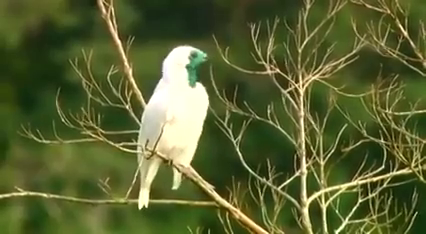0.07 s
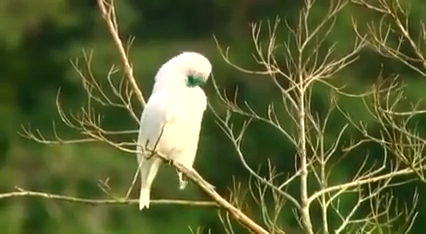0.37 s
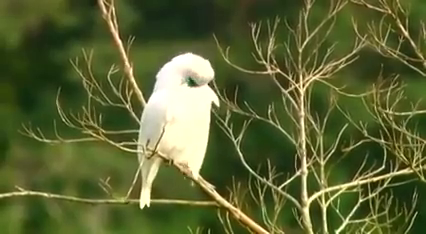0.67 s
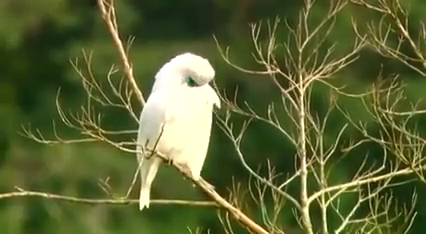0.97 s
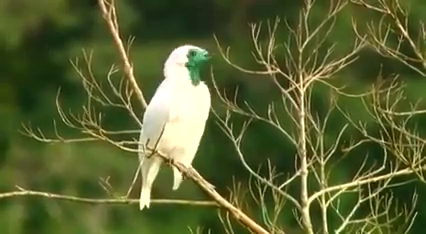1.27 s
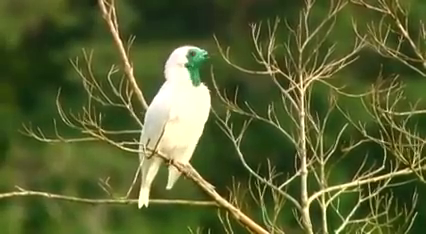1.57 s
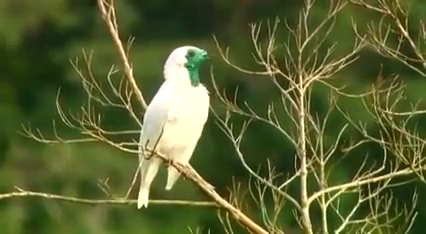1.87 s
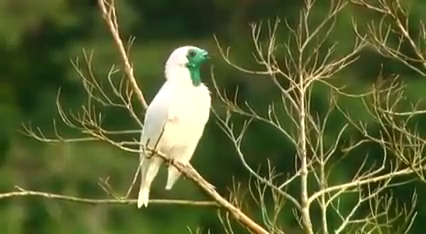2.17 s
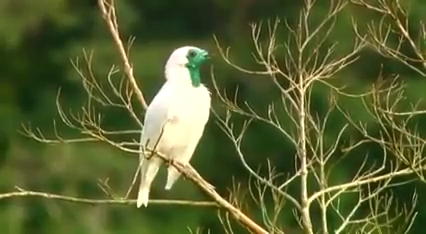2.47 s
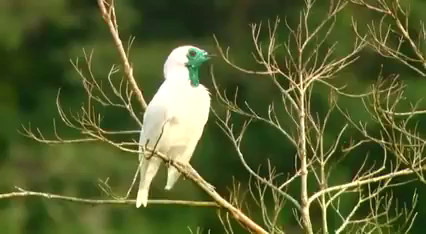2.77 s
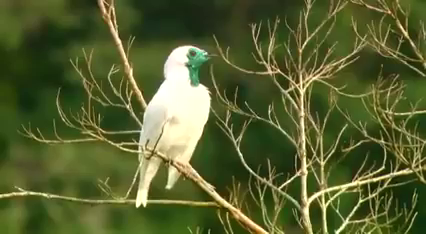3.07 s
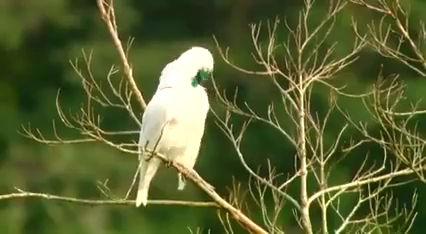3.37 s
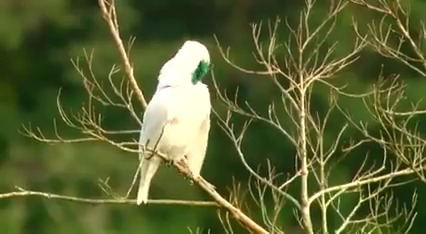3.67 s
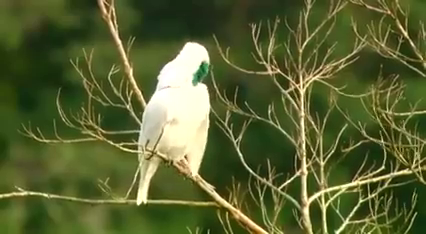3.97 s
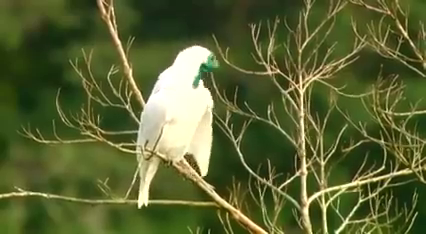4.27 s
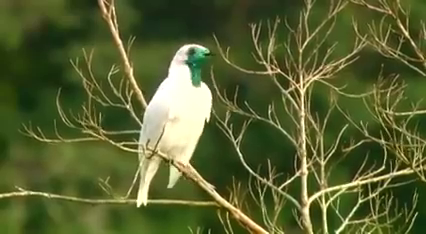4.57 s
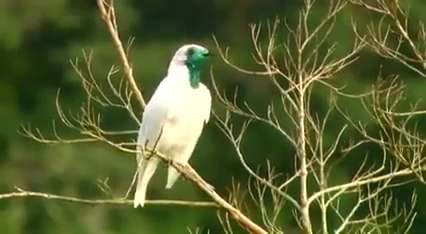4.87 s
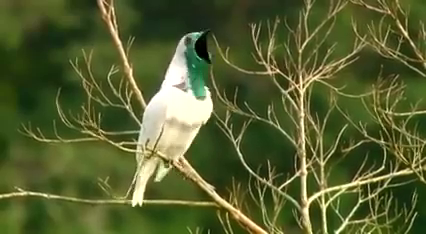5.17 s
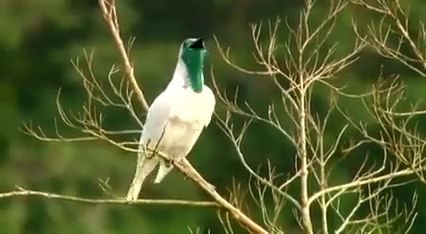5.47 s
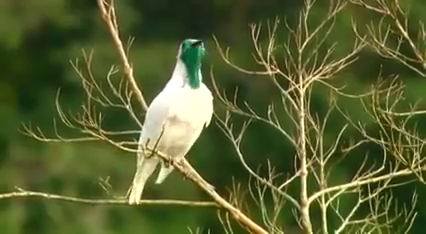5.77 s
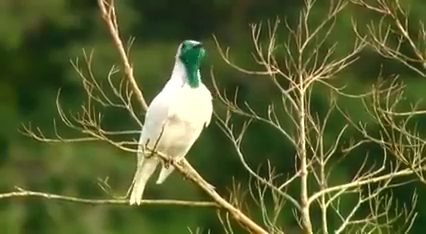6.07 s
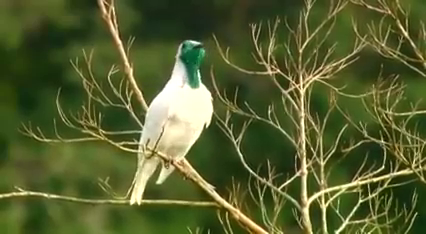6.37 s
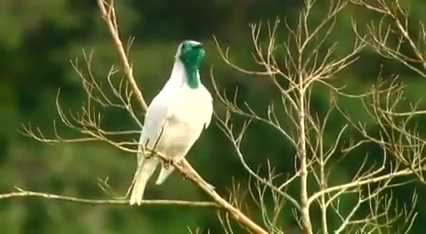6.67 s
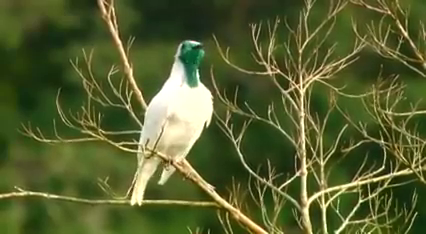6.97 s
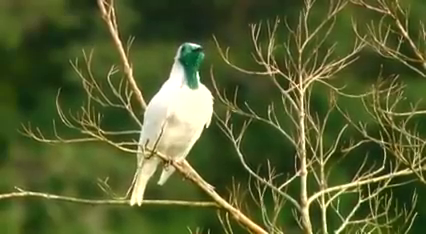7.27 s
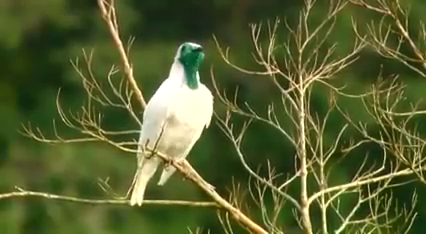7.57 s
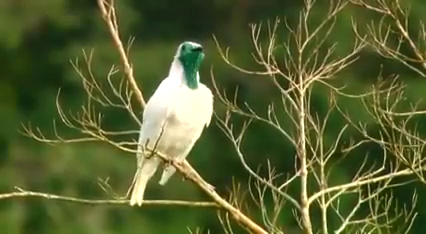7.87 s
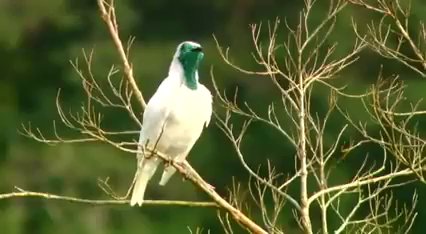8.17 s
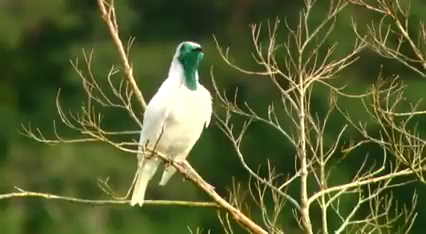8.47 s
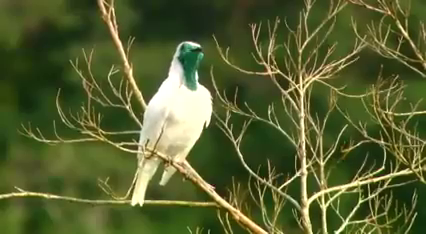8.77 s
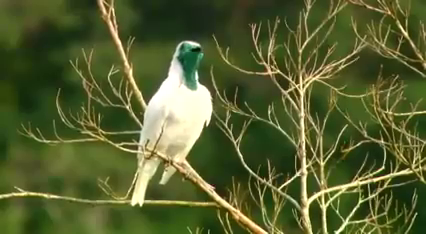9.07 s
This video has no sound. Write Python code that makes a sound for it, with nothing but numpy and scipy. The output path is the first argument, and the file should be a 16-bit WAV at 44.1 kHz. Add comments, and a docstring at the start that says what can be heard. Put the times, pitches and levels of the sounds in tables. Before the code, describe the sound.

One loud, abrupt bellbird call, rasping and then ringing, stands out midway through a quiet forest scene. Around it come duller calls from distant bellbirds, short sharp chips and faint whistles, all over a constant insect hiss, a broad valley rush and a faint far-off drone. A low rumble on the microphone swells under the loud call and again at the end, along with two short, soft rustles.

```python
"""A bellbird on a bare branch above the forest gives one loud clang: a harsh rasp into a pure ring.
The two sides of its syrinx sound in turn. Rivals answer from far off, small birds chip,
others whistle deep in the forest, and the trees throw back echoes.
Behind them insects hiss steadily over the rush of the valley and a faint, distant drone.
A low rumble on the microphone swells under the clang and near the end, where two rustles come close by."""
import sys
import numpy as np
from scipy import signal
from scipy.fft import rfft, irfft, next_fast_len
from scipy.io import wavfile

SR = 44100
rng = np.random.default_rng(int(sys.argv[2]) if len(sys.argv) > 2 else 0)


def int16_out(signal):
    """Quantize to a 16-bit WAV file."""
    q = np.round(np.clip(np.atleast_2d(signal).T, -1, 1) * 32767)
    wavfile.write(sys.argv[1], SR, q.astype(np.int16))


N = 402191
TIME = np.arange(N) / SR
FLUTTER_HZ, RASP_HZ = 80.2, 1444   # the bellbird's low voice: flutter rate, centre pitch

# colours of the valley's rush and of the insect chorus: frequency_hz, relative_db
VALLEY_SPECTRUM = [(30, -7), (100, -4), (200, -2), (300, -2.5), (420, 1), (700, -1.57), (1100, -6.5),
                   (1700, -13.5), (2800, -21), (5000, -19), (10000, -33)]
INSECT_SPECTRUM = [(2500, -27), (3600, -18.5), (4500, -3), (4900, -1.5), (5300, -8), (6100, -5.5),
                   (7000, -16), (8500, -24.5), (10000, -32)]
# course of the far-off drone: time_s, pitch_hz, level_db
DRONE_COURSE = [(0, 500, -83), (.3, 472, -57.5), (.6, 457, -54.5), (.95, 490, -57.5), (1.15, 398.6, -64),
                (2, 421, -60.5), (3.2, 412, -60), (4, 427.4, -64), (6.7, 400, -71.5), (7.15, 412, -52),
                (7.6, 403, -79)]
# course of the low rumble on the microphone: time_s, relative_db
RUMBLE_COURSE = [(0, -37), (.25, -65), (.7, -66), (3.3, -64), (3.7, -63), (3.9, -68), (5.1, -72.5),
                 (5.45, -42), (5.7, -49), (5.85, -66), (8.1, -61.5), (8.25, -45), (8.36, -59),
                 (8.48, -41.5), (8.66, -66), (8.84, -48), (9.12, -37)]
# its colour: frequency_hz, relative_db
RUMBLE_SPECTRUM = [(10, 4.5), (25, -1.5), (50, -16.5), (100, -26.5), (300, -36), (1000, -58)]
# echoes off the trees and the slope: delay_s, gain_db
FOREST_ECHOES = [(.014, -24), (0.046, -26), (.085, -26), (.145, -25.5), (.235, -43), (.29, -33.5)]
# a small bird's chips: peak_s, gain_db, pitch_ratio
CHIP_CALLS = [(0.014, -26.5, 1.03), (2.418, -37, 1.08), (4.31, -33.5, .96), (5.929, -34, 0.95),
              (7.439, -28, 1), (8.781, -33.5, 1.02)]
# course of one chip: from_peak_s, pitch_hz, relative_db
CHIP_COURSE = [(-.02, 6200, -22), (-.013, 4894, -13.5), (-.006, 4350, -6.5), (.004, 3964, -2),
               (.011, 3590, -15.5), (0.015, 3440, -3), (0.021, 2620, -29)]
# distant whistles: start_s, length_s, first_hz, middle_hz, last_hz, level_db, roughness (0-1)
WHISTLE_NOTES = [(0.257, 0.03, 2890, 2690, 2580, -52.5, .5), (1.356, .06, 2850, 2650, 2390, -58, .7),
                 (1.721, 0.057, 1998, 2222, 2170, -52.5, 1), (2.061, 0.095, 2750, 2705, 2650, -56.5, .9),
                 (2.692, 0.068, 2570, 2700, 2760, -55.5, .8), (2.748, .11, 4150, 4080, 3550, -54.5, 0.38),
                 (3.572, .08, 2760, 2700, 2400, -51.5, 1), (3.638, 0.08, 2420, 2696, 2900, -45, 0.21),
                 (3.754, 0.055, 1990, 2060, 1850, -53, .4), (4.04, .11, 4290, 4160, 3950, -53.5, 0.3),
                 (4.07, 0.09, 2850, 2755, 3050, -44, 0.26), (4.183, .1, 4860, 5500, 5400, -59, 0.3),
                 (4.208, .07, 2075, 2250, 1950, -52.5, .6), (4.72, 0.069, 3450, 3520, 3280, -58, .3),
                 (6.062, 0.045, 3800, 3920, 3530, -53.5, 0.54), (6.817, .11, 1850, 1930, 1860, -56, .2),
                 (7.12, 0.096, 4170, 4143, 3400, -49.5, 0.25), (7.16, 0.071, 1700, 1780, 1500, -54.5, .1),
                 (7.343, .1, 4170, 3750, 3570, -56, .3), (7.392, 0.16, 2250, 1894, 1670, -52.5, .1),
                 (7.869, .17, 3850, 3880, 4180, -53, 0.48), (8.058, 0.13, 5240, 4140, 3690, -50.5, 0.5),
                 (8.18, .14, 4210, 4530, 4600, -43.5, 0.27), (8.35, 0.12, 8340, 6730, 5600, -53.5, 1),
                 (8.417, .12, 6800, 6300, 6140, -54, 1), (8.43, .085, 5570, 5340, 5430, -35, 0.11),
                 (8.853, .11, 1390, 1300, 1230, -52, .1), (9.045, 0.028, 9950, 10050, 9900, -38, 0.9)]
# bellbirds near and far: start_s, rasp_gain_db, held_end_db, ring_gain_db, ring_hz, dulling_db_per_octave
BELLBIRD_CALLS = [(1.953, -42.5, -9, -75, 3170, 28), (2.19, -43.5, -10, -74, 3170, 32),
                  (4.788, -46, 2, -64, 3160, 16), (5.226, -38, -6, -68, 3160, 24),
                  (5.391, -18, 0.5, -23, 3148, 0.5), (6.136, -44, -3, -72, 3170, 28),
                  (6.474, -28, -18.5, -48.5, 3185, 17.5), (8.976, -48, -4, -68, 3170, 20)]
# resonances of throat and gaping beak: centre_hz, width_hz, gain_db
THROAT_RESONANCES = [(1551, 240, 0), (2780, 340, -2.5), (3190, 270, -4.5), (4205, 370, 0),
                     (4790, 320, -6.5), (5220, 660, -12.5), (6300, 420, -7.5), (7340, 220, -18),
                     (7743, 610, -19.5), (8540, 440, -25), (9400, 450, -35)]
# course of the low voice: into_call_s, relative_db, harshness (0-1)
RASP_COURSE = [(0, -24, 1), (.005, 0.5, 0.99), (.026, 1, 0.98), (.046, -1, 0.81), (.062, -2.5, 0.65),
               (.078, -12, 0.54), (.1, -12, .48), (.15, -14, 0.1), (.178, -12.5, .35), (.195, -50, 0)]
# course of the high voice: into_call_s, relative_db
RING_COURSE = [(.06, -42), (.085, -10), (.11, -2.5), (.145, 0.5), (.175, -4), (.193, -3.5), (.21, -21.5),
               (.25, -45)]
# harmonics of the high voice: multiple, relative_db
RING_HARMONICS = [(1, -0.5), (2, -13), (3, -28.5)]
# rustles close to the microphone: start_s, length_s, level_db
CLOSE_RUSTLES = [(8.85, 0.14, -48), (9.044, 0.062, -48.5)]
# their colour: frequency_hz, relative_db
RUSTLE_SPECTRUM = [(100, 3.5), (600, 1), (1500, -12), (3000, -17.5), (4300, -7), (7000, -18), (10000, -19)]


def from_db(db):
    """Decibels to gain."""
    return 10 ** (np.asarray(db) / 20)


def rms_one(x):
    """Scale to unit power."""
    return x / np.sqrt(np.mean(x ** 2) + 1e-20)


def along(course, t):
    """The columns of a course at times t."""
    times, *columns = np.transpose(course)
    return [np.interp(t, times, column) for column in columns]


def add(out, start_s, sound):
    """Mix a sound in at a time."""
    at = int(round(start_s * SR))
    sound = sound[max(-at, 0):max(N - at, 0)]
    out[max(at, 0):max(at, 0) + len(sound)] += sound


def phase_of(hz):
    """Running phase of a moving pitch."""
    return 2 * np.pi * np.cumsum(hz) / SR


def waver(rate_hz, size):
    """Random motion, mostly slower than rate_hz, at unit power."""
    hz = np.fft.rfftfreq(size, 1 / SR)
    return rms_one(irfft(rfft(rng.standard_normal(size)) / (1 + (hz / rate_hz) ** 2), size))


def noise(spectrum):
    """Noise of a given colour, at unit power."""
    size = next_fast_len(N)
    hz, db = np.transpose(spectrum)
    gain = from_db(np.interp(np.log(np.fft.rfftfreq(size, 1 / SR) + 1), np.log(hz), db))
    return rms_one(irfft(rfft(rng.standard_normal(size)) * gain, size)[:N])


def valley(level_db=-52.0, sway_db=1.34):
    """The broad rush of the valley, swaying a little in level."""
    return from_db(level_db + sway_db * waver(3.9, N)) * noise(VALLEY_SPECTRUM)


def insects(level_db=-61.5, flicker_db=1.1, shrill_hz=4880, shrill_width_hz=110, shrill_db=-64.5):
    """A flickering background chorus with one narrow, shrill band."""
    chorus = from_db(level_db + flicker_db * waver(25, N)) * noise(INSECT_SPECTRUM)
    shrill = from_db(shrill_db) * waver(shrill_width_hz, N) * np.sin(2 * np.pi * shrill_hz * TIME)
    return chorus + shrill


def drone(wobble_hz=6):
    """A faint, wandering tone a long way off."""
    pitch_hz, level_db = along(DRONE_COURSE, TIME)
    return from_db(level_db) * np.sin(phase_of(pitch_hz + wobble_hz * waver(19.8, N)))


def microphone_rumble(trim_db=-1):
    """Low rumble on the microphone: it drops at the start, swells under the loud clang and near the end."""
    swell_db, = along(RUMBLE_COURSE, TIME)
    return from_db(swell_db + trim_db) * noise(RUMBLE_SPECTRUM)


def forest(direct, scatter_db, decay_s, leaf_cutoff_hz):
    """The direct sound plus distinct echoes and a thin scatter off trunks and leaves, both dulled."""
    t = np.arange(SR) / SR
    response = rng.standard_normal(SR) * from_db(-60 * t / decay_s) * (1 - np.exp(-t / 0.029))
    response *= from_db(scatter_db) / np.linalg.norm(response)
    for delay_s, gain_db in FOREST_ECHOES:
        response[int(delay_s * SR)] += from_db(gain_db)
    response = signal.sosfilt(signal.butter(1, leaf_cutoff_hz, fs=SR, output="sos"), response)
    return direct + signal.fftconvolve(direct, response)[:N]


def chips(jitter_hz=150, upper_ratio=1.27, upper_db=-16, octave_db=-30, scratch_db=-14):
    """A small bird's fast downward sweeps, with a second voice above and a scratchy edge."""
    out, t = np.zeros(N), np.arange(CHIP_COURSE[0][0], CHIP_COURSE[-1][0], 1 / SR)
    pitch_hz, shape_db = along(CHIP_COURSE, t)
    for peak_s, gain_db, pitch_ratio in CHIP_CALLS:
        phase = phase_of(pitch_ratio * pitch_hz + jitter_hz * waver(600, len(t)))
        tone = from_db(shape_db) * (np.sin(phase) + from_db(octave_db) * np.sin(2 * phase))
        upper_voice = from_db(upper_db) * np.sin(upper_ratio * phase)
        scratch = from_db(scratch_db) * waver(1700, len(t)) * np.sin(phase)
        edge = signal.windows.tukey(len(t)) * (upper_voice + scratch)
        add(out, peak_s + t[0], from_db(gain_db) * (tone + edge))
    return out


def whistles(full_jitter_hz=330, shimmer=0.27):
    """Birds farther off: each whistle bends through three pitches under a rounded swell."""
    out = np.zeros(N)
    for start_s, length_s, *pitches_hz, level_db, roughness in WHISTLE_NOTES:
        progress = np.linspace(0, 1, int(length_s * SR))
        bend_hz = np.polyval(np.polyfit([0, .5, 1], pitches_hz, 2), progress)
        pitch_hz = bend_hz + roughness * full_jitter_hz * waver(350, len(progress))
        swell = np.sin(np.pi * progress) * (1 + shimmer * waver(70, len(progress)))
        add(out, start_s, from_db(level_db) * swell * np.sin(phase_of(pitch_hz)))
    return out


def twitter(count=36, quietest_db=-64, range_db=2, max_glide=0.23):
    """Tiny gliding notes at random moments, from deep in the forest."""
    out = np.zeros(N)
    for when, length, height, slope, strength in rng.random((count, 5)):
        progress = np.linspace(0, 1, int((.03 + .06 * length) * SR))
        glide = 1 + max_glide * (2 * slope - 1) * progress
        pitch_hz = (1800 + 2600 * height) * glide + 100 * waver(360, len(progress))
        swell = from_db(quietest_db + range_db * strength) * np.sin(np.pi * progress)
        add(out, when * N / SR, swell * np.sin(phase_of(pitch_hz)))
    return out


def throat(hz, dulling):
    """Gain of the bellbird's steep-sided throat resonances, less the treble lost over distance."""
    gain = sum(from_db(gain_db) / (1 + np.abs(2 * (hz - centre_hz) / width_hz) ** 3)
               for centre_hz, width_hz, gain_db in THROAT_RESONANCES)
    return gain * from_db(-dulling * np.log2(np.clip(hz / RASP_HZ, 1, 3)))


def rasp(t, held_end_db, dulling, swing_hz=136, jitter_hz=28, first_crest_s=0.00601,
         soften_db=19, hiss_gain=0.71, odd_burst_db=4.0, shimmer_db=3.0):
    """The low voice: a flutter swings its pitch, so each harmonic flashes through the resonances."""
    shape_db, harshness = along(RASP_COURSE, t)
    flutter = 2 * np.pi * FLUTTER_HZ * (t - first_crest_s)
    # as it relaxes, the voice settles one flutter step higher, near the lowest resonance
    pitch_hz = RASP_HZ + FLUTTER_HZ * (harshness < .5) + harshness * swing_hz * np.cos(flutter)
    # single cycles come early or late without losing the beat
    jitter = rms_one(np.gradient(waver(490, len(t))))
    phase = phase_of(pitch_hz + harshness * jitter_hz * jitter)
    fundamental = throat(pitch_hz, dulling) * np.sin(phase)
    overtones = 0
    for k in range(2, 8):
        # odd harmonics burst out as the pitch falls, even ones as it climbs
        burst_db = odd_burst_db * np.sin(flutter) * (1 if k % 2 else -.5)
        flicker = from_db(burst_db + shimmer_db * waver(360, len(t)))
        overtones += throat(k * pitch_hz, dulling) * flicker * np.sin(k * phase)
    hiss_colour = throat(np.fft.rfftfreq(len(t), 1 / SR), dulling)
    hiss = irfft(rfft(rng.standard_normal(len(t))) * hiss_colour, len(t))
    edge = from_db(-soften_db * (1 - harshness)) * (overtones + hiss_gain * hiss)
    return from_db(shape_db + held_end_db * (1 - harshness)) * (fundamental + edge)


def ring(t, pitch_hz, dulling, jitter_hz=7, overtone_lead_s=0.0062):
    """The high voice: one steady pitch whose overtones swell first and fade first."""
    phase = phase_of(pitch_hz + jitter_hz * waver(90, len(t)))
    out = 0
    for k, relative_db in RING_HARMONICS:
        swell_db = along(RING_COURSE, t + overtone_lead_s * (k > 1))[0] * np.sqrt(k)
        out += from_db(relative_db + swell_db - dulling * np.log2(k)) * np.sin(k * phase)
    return out


def bellbirds():
    """The two sides of the syrinx sound in turn; far rivals arrive duller, with more scatter."""
    near, far, t = np.zeros(N), np.zeros(N), np.arange(SR // 4) / SR
    for start_s, rasp_gain_db, held_end_db, ring_gain_db, ring_hz, dulling in BELLBIRD_CALLS:
        low_voice = from_db(rasp_gain_db) * rasp(t, held_end_db, dulling)
        high_voice = from_db(ring_gain_db) * ring(t, ring_hz, dulling)
        add(near if dulling < 10 else far, start_s, low_voice + high_voice)
    return (forest(near, scatter_db=-17.5, decay_s=1.0, leaf_cutoff_hz=2500)
            + forest(far, scatter_db=-14.5, decay_s=0.46, leaf_cutoff_hz=4000))


def rustles():
    """Two short swells of noise close to the microphone."""
    swell = np.zeros(N)
    for start_s, length_s, level_db in CLOSE_RUSTLES:
        add(swell, start_s, from_db(level_db) * signal.windows.tukey(int(length_s * SR)))
    return swell * noise(RUSTLE_SPECTRUM)


def scene():
    """In mono: the close bellbird is driest; rivals, chips and whistles carry more forest echo."""
    birds = bellbirds() + forest(chips(), scatter_db=-8.5, decay_s=0.29, leaf_cutoff_hz=5500)
    far_birds = forest(whistles() + twitter(), scatter_db=-4, decay_s=0.31, leaf_cutoff_hz=3500)
    ambience = valley() + insects() + drone()
    return (birds + far_birds + ambience + microphone_rumble() + rustles())[None]


def record(dry, thump_gain_db=-4, thump_band_hz=(12, 56), cutoff_hz=9980):
    """The microphone's lopsided response leaves a soft thump under loud sounds; the top is cut steeply."""
    thump = signal.sosfilt(signal.butter(2, thump_band_hz, "band", fs=SR, output="sos"), np.abs(dry))
    treble_cut = signal.ellip(10, .2, 70, cutoff_hz, fs=SR, output="sos")
    return signal.sosfilt(treble_cut, dry + from_db(thump_gain_db) * thump)


dry = scene()
out = record(dry)
int16_out(out)
```